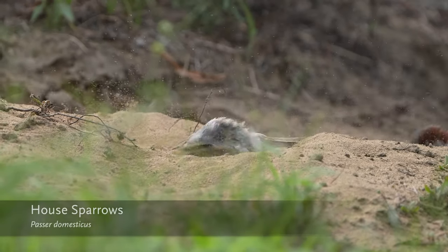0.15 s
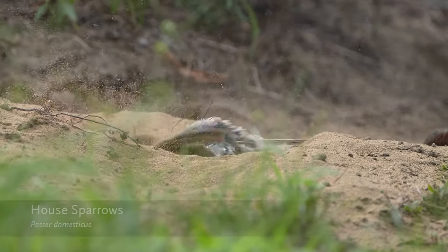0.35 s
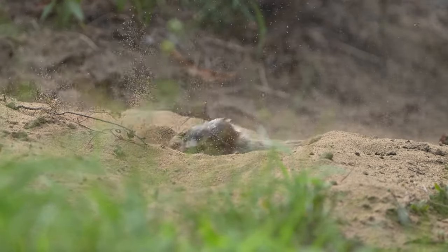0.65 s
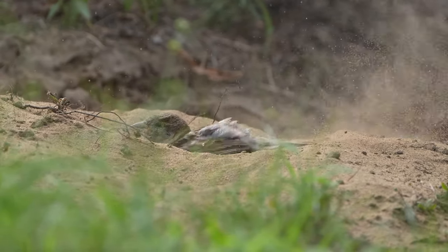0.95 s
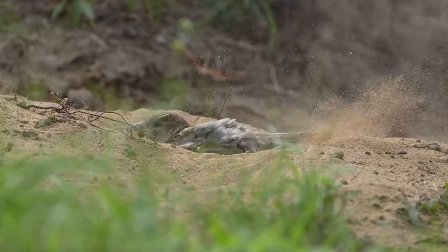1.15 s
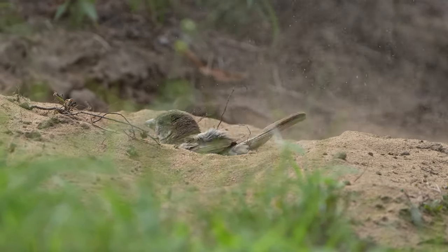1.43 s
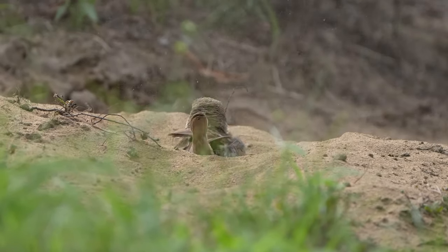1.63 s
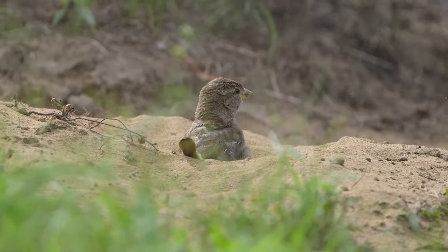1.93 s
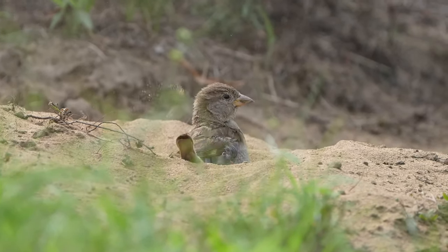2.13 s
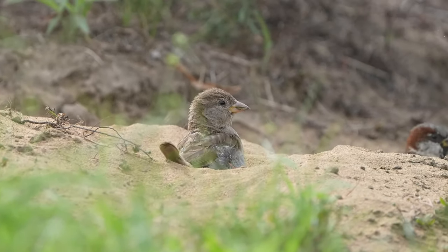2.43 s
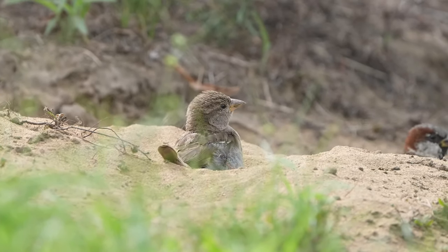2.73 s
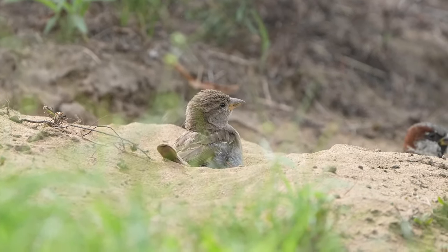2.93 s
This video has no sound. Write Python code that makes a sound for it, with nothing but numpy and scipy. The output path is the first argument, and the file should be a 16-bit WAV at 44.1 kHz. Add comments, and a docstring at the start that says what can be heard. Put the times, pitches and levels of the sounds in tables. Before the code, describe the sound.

Harsh raspy bird chatter, four quick notes, rings briefly off a sand bank; fainter chirps and trills continue, with a low shuffle in sand past two seconds, over steady low rumble, faint motor hum and insect hiss.

```python
"""Rustling air, distant rumble, a cricket hiss and a low motor hum: steady random noise and wavering sines.
Over them, a bird close by scolds four harsh, rasping notes: a falling tone that breaks up into noise.
Farther birds scold, whistle and trill as swept sines; all the birds ring off a summer sand bank.
Sand ticks as noise bursts, and soft thuds and a rustle come from sparrows bathing in the dust."""
import sys
import numpy as np
from scipy import signal
from scipy.fft import rfft, irfft
from scipy.io import wavfile
from scipy.ndimage import uniform_filter1d

SR = 44100
rng = np.random.default_rng(int(sys.argv[2]) if len(sys.argv) > 2 else 0)


def waveform_to_disk(signal):
    """Save audio, clipped to [-1, 1], as 16-bit WAV at the path in sys.argv[1]."""
    frames = np.transpose(np.atleast_2d(signal))
    scaled = np.clip(frames, -1, 1) * 32767
    samples = np.round(scaled).astype(np.int16)
    wavfile.write(sys.argv[1], SR, samples)


N = 135828
T = np.arange(N) / SR  # time [s]
F = np.fft.rfftfreq(N, 1 / SR) + 1e-3  # frequency [Hz], kept above zero for the logarithm


def amp(db):
    """Level law: decibels to an amplitude ratio."""
    return 10 ** (np.asarray(db) / 20)


def unit(x):
    """Normalization: scale to an RMS of 1."""
    return x / np.sqrt(np.mean(x ** 2))


def over_time(table):
    """Linear interpolation of a (time [s], value) table."""
    times, values = np.array(table).T
    return np.interp(T, times, values)


def over_hz(table):
    """Interpolation of a (frequency [Hz], value) table on a logarithmic frequency axis."""
    hz, values = np.array(table).T
    return np.interp(np.log(F), np.log(hz), values)


def peak(hz, width_hz):
    """Gaussian band-pass: a bell-shaped gain over frequency; the width is its standard deviation."""
    return np.exp(-.5 * ((F - hz) / width_hz) ** 2)


def noise(gain):
    """Spectral shaping: white noise multiplied by a gain over frequency."""
    return irfft(rfft(rng.standard_normal(N)) * gain, N)


def walk(rate_hz):
    """Low-pass random modulation: a smooth wandering signal with an RMS of 1."""
    return unit(noise(peak(0, rate_hz)))


def gate(t0, length, attack, release):
    """Amplitude envelope: linear attack within the length, then exponential release (all in seconds)."""
    rise = np.clip((T - t0) / attack, 0, 1)
    return rise * np.exp(-np.clip(T - t0 - length, 0, None) / release)


def tone(hz):
    """Phase accumulation: the integral of a moving frequency, in radians."""
    return 2 * np.pi * np.cumsum(hz) / SR


def pan(db):
    """Interchannel level difference: left and right gains, left higher by db."""
    return amp(np.array([[db], [-db]]) / 2)


# Mid spectrum of the air (frequency [Hz], relative density [dB per Hz])
AIR_SPECTRUM = [(20, -22), (30, -7), (42, 1), (62, -12.5), (97, -6), (140, -4), (185, -3.5), (230, -10.5),
                (340, -14), (493, -21), (929, -19), (1150, -24), (1600, -29), (2500, -28), (5000, -32),
                (6550, -34), (9120, -36), (13000, -36), (15800, -38.5)]
# Stereo width of the air (frequency [Hz], side minus mid [dB])
AIR_SIDE_LEVEL = [(60, -54), (125, -29.5), (250, -13.5), (500, -5), (1000, -3.5), (2000, -0.7), (8000, 1),
                  (15000, 0)]
# Stereo balance of the air (frequency [Hz], left minus right [dB])
AIR_BALANCE = [(150, 0), (300, 1), (600, 1.7), (1200, .3), (3000, -1), (15000, -.3)]
# Slow swell of the air's treble (time [s], relative level [dB])
AIR_TREBLE = [(0, 0), (1, -1), (1.5, 0), (2, 4), (2.5, 2.5), (3.08, 5.5)]
AIR_DB = -44.5


def air():
    """Broadband noise: rumble to hiss in independently flickering octaves, the bass nearly mono."""
    shape = amp(over_hz(AIR_SPECTRUM))
    balance = amp(over_hz(AIR_BALANCE) / 2)
    treble_db = over_time(AIR_TREBLE)
    mid = noise(shape)
    side = noise(shape * amp(over_hz(AIR_SIDE_LEVEL)))
    spectra = rfft(np.array([mid + side, mid - side])) * np.array([balance, 1 / balance])
    out = 0
    for k in range(10):
        # overlapping octave bands, centred from 31.25 Hz upward
        share = np.cos(np.pi / 2 * np.clip(np.log2(F / 31.25) - k, -1, 1)) ** 2
        # the treble swell takes hold gradually above 500 Hz
        db = 1.34 * walk(2.8) + treble_db * np.clip((k - 4) / 4, 0, 1)
        out = out + amp(db) * irfft(spectra * share, N)
    return unit(out) * amp(AIR_DB)


# Cricket chorus swell (time [s], level [dB])
CRICKET_SWELL = [(0, -52), (1, -50.5), (2, -49), (3.08, -49)]
# Bands of the chorus (centre [Hz], two standard deviations wide [Hz], relative gain [dB])
CHORUS_BANDS = [(7413, 430, 2), (7930, 230, -2.5), (8010, 1200, -2)]


def crickets():
    """Incoherent summation: many far crickets merge into a narrow-band, faintly throbbing hiss."""
    gain = sum(amp(db) * peak(hz, width / 2) for hz, width, db in CHORUS_BANDS)
    left, right, shared = (noise(gain) * amp(1.8 * walk(36)) for _ in range(3))
    chorus = np.array([left, right]) + .15 * shared
    return unit(chorus) * amp(over_time(CRICKET_SWELL)) * pan(-2.3)


# Motor tones (mean pitch [Hz], RMS waver [Hz], RMS level before flicker [dB])
MOTOR_TONES = [(75.2, 2.96, -43), (116.9, 8.05, -51.5), (238.3, 2.78, -62), (910, 4.5, -71)]


def hum():
    """Random frequency and amplitude modulation: low motor tones, slightly unsteady."""
    out = 0
    for hz, waver_hz, db in MOTOR_TONES:
        level = np.sqrt(2) * amp(db + 1.25 * walk(9.7))
        out = out + level * np.sin(tone(hz + waver_hz * walk(10)))
    return out


# Scolding notes (time [s], length [s], level before the accent [dB], resting pitch [Hz],
# extra pitch at the start [share], rasp gain [dB], left minus right [dB])
SCOLD_NOTES = [(0.002, 0.035, -50.5, 2496, 0.017, -4.5, 2), (0.42, 0.043, -38, 2470, 0.29, 0, -2.5),
               (0.5137, 0.042, -36, 2383, .3, -1, 0), (0.618, 0.041, -36, 2415, .3, 1, -1.5),
               (0.7436, 0.043, -39, 2414, .1, 1.5, -0.5), (1.169, 0.033, -54.5, 2450, 0.033, -10, 1),
               (1.262, 0.025, -54, 2345, 0.083, -10, 3), (1.359, 0.046, -57, 2390, 0.044, -2, 3),
               (1.477, 0.061, -57, 2380, 0.037, -3, 4), (1.629, 0.017, -51, 2440, 0.1, -15, 3),
               (2.69, 0.065, -61, 2550, 0.19, 0, 10), (2.815, 0.014, -55.5, 2620, 0.033, -34, -12)]
# Levels of the second and third harmonic of the resting pitch [dB]
SCOLD_HARMONICS = (0, -16.5)
# Spectrum of the rasp (frequency [Hz], relative density [dB per Hz])
RASP_SPECTRUM = [(1060, -33), (1800, -33), (3130, -8.5), (4040, -10.5), (5030, -9), (6790, -8.5),
                 (7710, -5), (13900, -16), (15400, -32), (15800, -29)]
DROP_S = 0.00495  # time constant of the fall to the resting pitch
WOBBLE, WOBBLE_HZ, CLEAR_S = .1, 348, 0.00696  # RMS pitch shake [share], its speed, the clear start
ATTACK_S, RELEASE_S = 0.00086, 0.021
ACCENT_DB, ACCENT_S = 5.5, 0.02  # the voice is loudest at its clear start
BASS_SPLIT_HZ, SPLIT_HZ = 1820, 8400
BASS_RISE_S, RASP_RISE_S, TREBLE_RISE_S = 0.01, .014, 0.06
RASP_DB, RASP_GRAIN_DB = -1.2, 2
# the other side of the voice box: its final pitch, extra starting pitch, fall time and level
LOW_VOICE_HZ, LOW_VOICE_DROP_HZ, LOW_VOICE_S, LOW_VOICE_DB = 2500, 1300, 0.014, -10.5


def rasp_bands():
    """Band splitting: grainy rasp noise parted into bass, body and treble of joint spread 1."""
    below_treble = 1 / (1 + (F / SPLIT_HZ) ** 6)
    below_body = 1 / (1 + (F / BASS_SPLIT_HZ) ** 8)
    shape = amp(over_hz(RASP_SPECTRUM))
    gains = (below_body, below_treble - below_body, 1 - below_treble)
    bands = [noise(shape * gain) * amp(RASP_GRAIN_DB * walk(250)) for gain in gains]
    return np.array(bands) / np.std(sum(bands))


def scolds():
    """Two-source phonation: a clear falling start turns shaky and raspy over a lower sliding voice."""
    out, shake = 0, walk(WOBBLE_HZ)
    bass, body, treble = rasp_bands()
    for t0, length, db, hz, drop, rasp_db, pan_db in SCOLD_NOTES:
        age = np.clip(T - t0, 0, None)
        wobble = WOBBLE * (1 - np.exp(-(age / CLEAR_S) ** 2)) * shake
        phase = tone(hz * (1 + drop * np.exp(-age / DROP_S) + wobble))
        voice = sum(amp(p) * np.sin((k + 2) * phase) for k, p in enumerate(SCOLD_HARMONICS))
        low_hz = LOW_VOICE_HZ + LOW_VOICE_DROP_HZ * np.exp(-age / LOW_VOICE_S)
        voice = voice + amp(LOW_VOICE_DB) * np.sin(tone(low_hz * (1 + wobble)))
        voice = voice * amp(ACCENT_DB * np.exp(-age / ACCENT_S))
        # each band of the rasp swells at its own pace, the treble last
        rasp = np.clip(age / BASS_RISE_S, 0, 1) * bass
        rasp = rasp + np.clip(age / RASP_RISE_S, 0, 1) ** 2 * body
        rasp = rasp + np.clip(age / TREBLE_RISE_S, 0, 1) ** 1.2 * treble
        note = voice + amp(RASP_DB + rasp_db) * rasp
        out = out + pan(pan_db) * amp(db) * gate(t0, length, ATTACK_S, RELEASE_S) * note
    return out


ECHO_T60_S, ECHO_DB, ECHO_DAMP_HZ = 0.49, -1, 15100  # level before damping


def echo(x):
    """Diffuse scattering from bank and bushes: convolution with decaying noise, unrelated left and right."""
    age = T[:SR]
    tail = rng.standard_normal((2, SR)) * amp(-60 * age / ECHO_T60_S) * np.clip(age / 0.0027, 0, 1)
    tail = tail / np.sqrt(np.sum(tail[0] ** 2))
    tail = signal.lfilter(*signal.butter(1, ECHO_DAMP_HZ, fs=SR), tail)
    return amp(ECHO_DB) * signal.fftconvolve(x, tail, axes=1)[:, :N]


# One pitch contour per whistle (time [s], pitch [Hz], level before flicker [dB])
WHISTLE_CONTOURS = [
    [(.222, 3060, -54), (.25, 3580, -57.5), (.27, 3060, -55), (.285, 3200, -71)],
    [(.228, 1680, -61), (.24, 2270, -59), (.252, 2590, -57)],
    [(.272, 2540, -52), (.29, 2520, -57), (.312, 2130, -69)],
    [(.897, 1914, -55), (.93, 2860, -49), (.936, 3540, -74), (.942, 3910, -51), (.955, 4140, -56),
     (.985, 3500, -52.5), (1.027, 3050, -76)],
    [(.977, 2960, -49.5), (1.005, 2650, -70), (1.03, 2240, -53)],
    [(1.26, 2800, -69), (1.295, 3290, -58), (1.32, 3000, -58)],
    [(1.365, 3050, -63), (1.395, 3180, -63), (1.43, 3550, -61)],
    [(2.172, 1977, -48.5), (2.195, 2350, -46.5), (2.21, 2900, -50.5), (2.222, 3520, -53.5),
     (2.245, 3320, -74)],
]
# Octave above each whistle, relative to it and before its fade on high notes [dB]
WHISTLE_OCTAVES = [-36, 6.5, 1, -20, -18, -10, -25, -10]
WHISTLE_FLICKER_DB, WHISTLE_SHAKE = 2.2, .014  # RMS level flicker, RMS pitch shake [share]


def whistles():
    """Frequency glide: slightly hoarse sines whose octave fades out on the higher notes."""
    out, shake, flicker = 0, walk(230), amp(WHISTLE_FLICKER_DB * walk(70))
    for rows, octave_db in zip(WHISTLE_CONTOURS, WHISTLE_OCTAVES):
        t, hz, db = np.array(rows).T
        hz = uniform_filter1d(np.interp(T, t, hz), size=200)  # rounds the corners of the glide
        phase = tone(hz * (1 + WHISTLE_SHAKE * shake))
        env = amp(np.interp(T, t, db)) * gate(t[0], t[-1] - t[0], 0.0032, 0.0066) * flicker
        octave = amp(octave_db) * np.exp(-(hz / 2650) ** 8) * np.sin(2 * phase)
        out = out + np.sqrt(2) * env * (np.sin(phase) + octave)
    return out


# Trills (time [s], length [s], first and last centre pitch [Hz], swing [share of pitch],
# level before flicker [dB])
TRILL_NOTES = [(.372, .07, 2350, 2927, 0.12, -51), (1.096, .1, 2350, 2557, 0.12, -55),
               (1.212, 0.061, 2434, 2610, 0.15, -60), (1.469, 0.1, 2410, 2438, .12, -50.5),
               (1.595, 0.15, 2290, 2570, 0.068, -59.5), (1.767, .11, 2540, 2830, .15, -54),
               (1.887, 0.046, 2506, 2390, 0.18, -52.5), (1.953, 0.26, 1957, 2320, 0.083, -59.5),
               (2.223, 0.028, 2096, 2000, .04, -55), (2.498, 0.28, 2400, 2370, 0.11, -60.5)]
TRILL_RATE_HZ, TRILL_SHAKE, TRILL_FLICKER_DB = 61, 0.02474, 2.0  # mean rate, RMS shake [share], RMS flicker


def trills():
    """Periodic frequency modulation: a tone swept up and down rapidly, louder on the upstroke."""
    out, waver, flicker = 0, walk(20.3), amp(TRILL_FLICKER_DB * walk(44))
    shake = walk(233)
    cycle_phase = tone(TRILL_RATE_HZ * (1 + 0.025 * waver))
    for t0, length, hz0, hz1, swing, db in TRILL_NOTES:
        cycle = cycle_phase - cycle_phase[int(t0 * SR)]  # every trill starts at its lowest pitch
        centre = np.interp(T, [t0, t0 + length], [hz0, hz1])
        hz = centre * (1 - swing * np.cos(cycle) + TRILL_SHAKE * shake)
        env = amp(db) * gate(t0, length, 0.034, 0.0081) * flicker * (1 + 0.22 * np.sin(cycle))
        out = out + env * np.sin(tone(hz))
    return np.sqrt(2) * out


# Soft thuds in the sand (time [s], level before the envelope [dB], pitch [Hz])
SAND_THUDS = [(.452, -30, 480), (0.626, -36.5, 460), (0.907, -48, 450), (2.22, -35, 327), (2.271, -33, 378),
              (2.291, -37, 313), (2.423, -34.5, 394)]
THUD_S = 0.0039  # decay time constant


def thuds():
    """Damped oscillation: short low sines that die away exponentially."""
    out = 0
    for t0, db, hz in SAND_THUDS:
        env = gate(t0, 0.00083, 0.00077, THUD_S)
        out = out + amp(db) * env * np.sin(2 * np.pi * hz * (T - t0))
    return out


# Sand and twig ticks (time [s], peak of the click alone [dB], centre [Hz])
SAND_TICKS = [(.6712, -23.5, 4750), (1.125, -39.5, 11000), (1.187, -47, 4440), (1.425, -45, 12400),
              (1.868, -36, 4200), (1.911, -40, 11100), (2.753, -31.5, 3470), (2.908, -35.5, 4000),
              (2.909, -37, 12000)]
TICK_S, TICK_WIDTH = 0.0018, 0.37  # grit decay time constant, bandwidth [share of the centre]


def ticks():
    """Impulse excitation: a broad band-limited click with a little decaying grit after it."""
    out = 0
    for t0, db, hz in SAND_TICKS:
        band = peak(hz, TICK_WIDTH * hz)
        click = irfft(band * np.exp(-2j * np.pi * F * t0), N)  # the phase slope delays it to t0
        grit = gate(t0, 0, 0.00013, TICK_S) * unit(noise(band))
        out = out + amp(db) * (click / click.max() + 0.62 * grit)
    return out


# Low shuffling in the sand (time [s], level [dB])
SCUFFLE_SWELL = [(2.17, -78), (2.22, -55), (2.3, -49.5), (2.36, -56), (2.43, -56), (2.52, -72)]
SCUFFLE_HZ, SCUFFLE_WIDTH_HZ = 340, 210


def scuffle():
    """Friction noise: a rough, low band of noise from a body shifting in the hollow."""
    rustle = noise(peak(SCUFFLE_HZ, SCUFFLE_WIDTH_HZ)) * amp(4.4 * walk(30))
    return unit(rustle) * amp(over_time(SCUFFLE_SWELL))


def scene():
    """Superposition: background, birds with their echo, and the sounds of the sand."""
    background = air() + crickets() + hum()
    birds = scolds() + whistles() * pan(-1.2) + trills() * pan(0.093)
    return background + birds + echo(birds) + thuds() + ticks() + scuffle()


TOP_HZ = 15930


def record(dry):
    """Band limitation: a steep elliptic low-pass cuts the top."""
    return signal.sosfilt(signal.ellip(16, .3, 60, TOP_HZ, fs=SR, output="sos"), dry)


dry = scene()
out = record(dry)
waveform_to_disk(out)
```